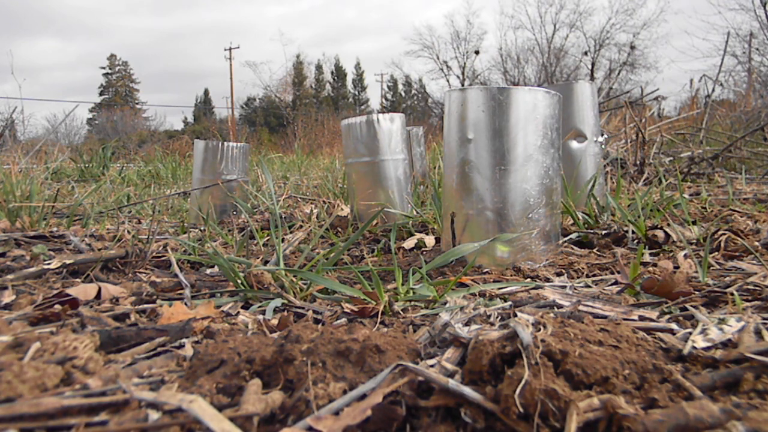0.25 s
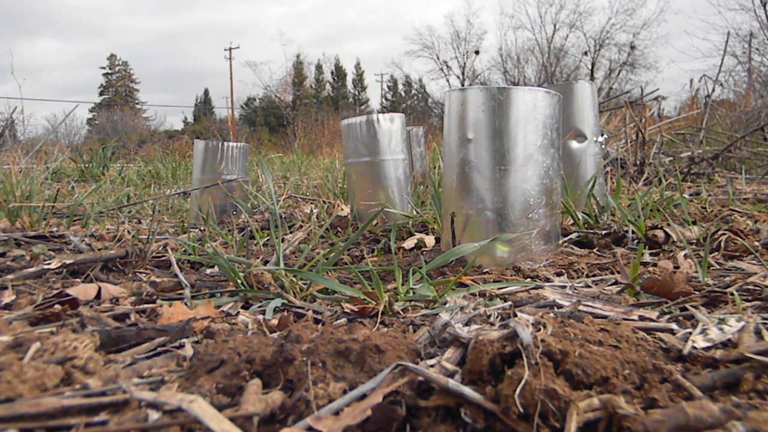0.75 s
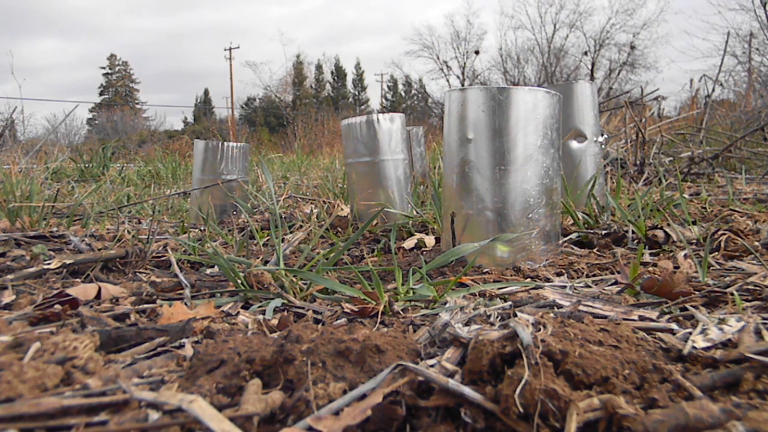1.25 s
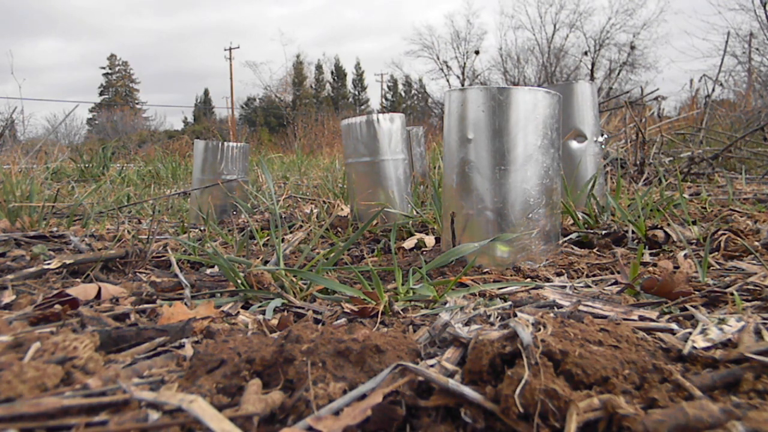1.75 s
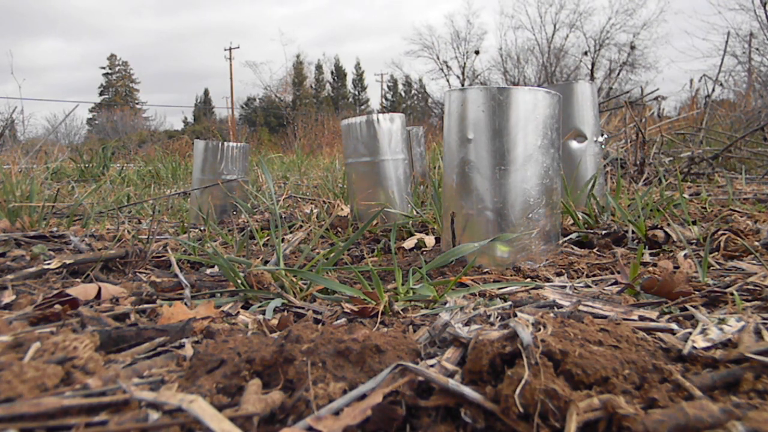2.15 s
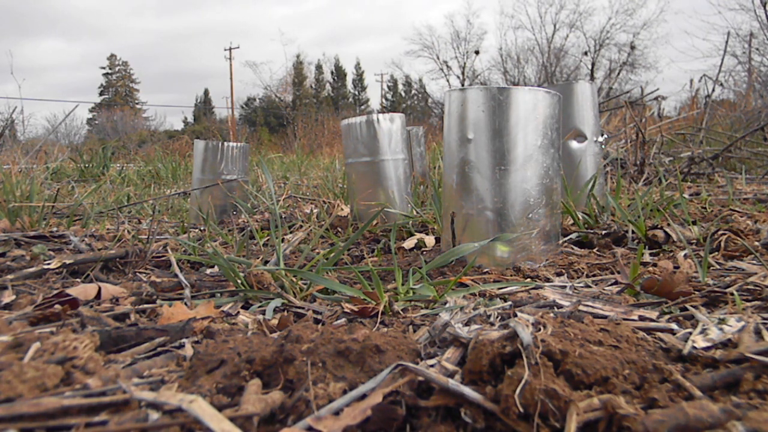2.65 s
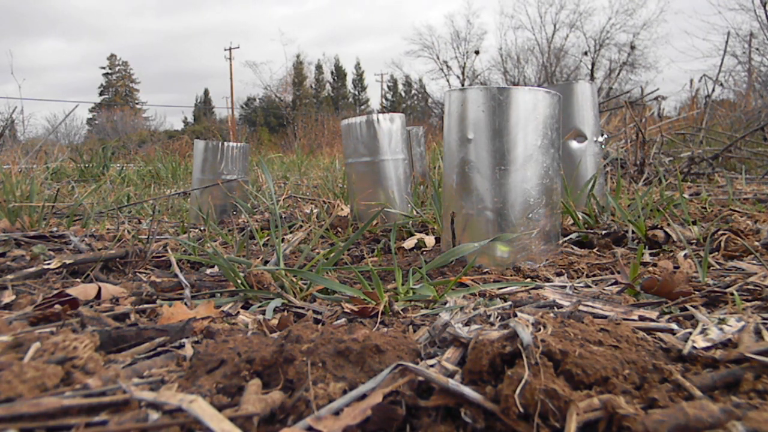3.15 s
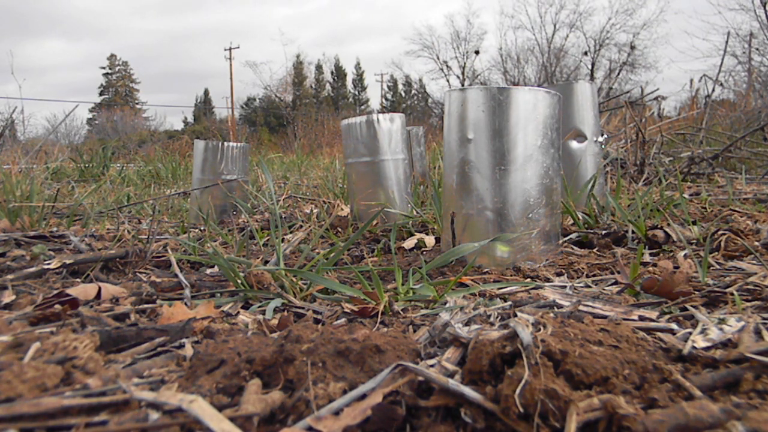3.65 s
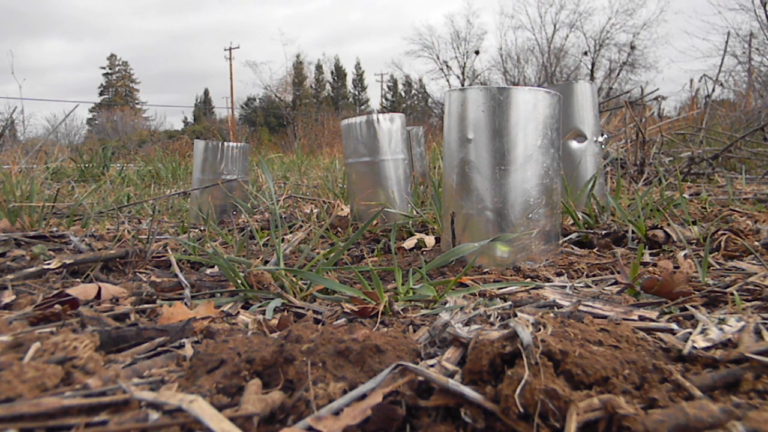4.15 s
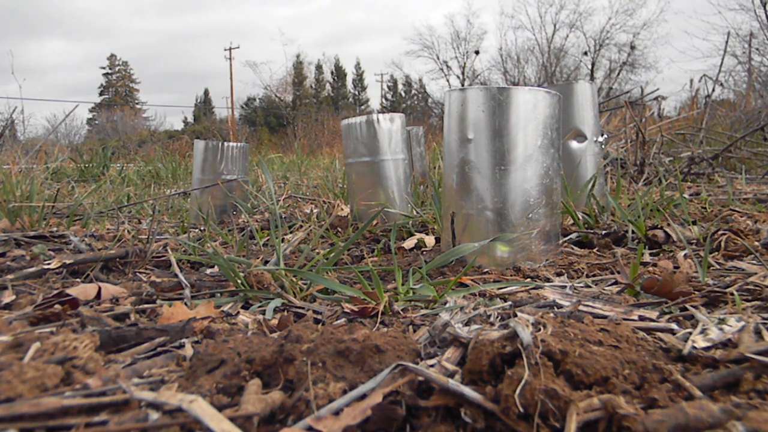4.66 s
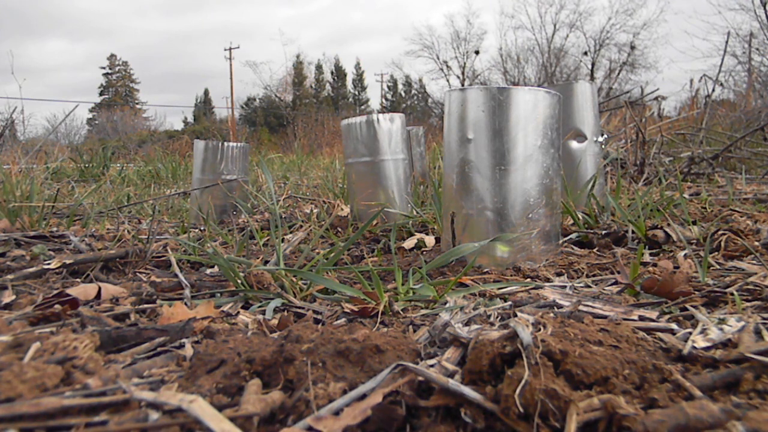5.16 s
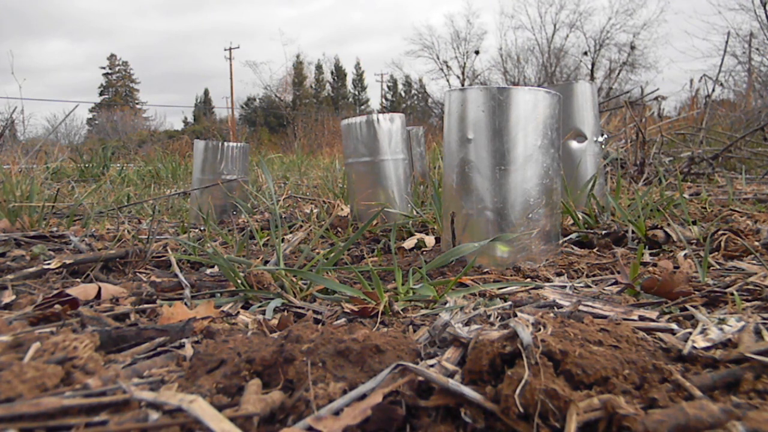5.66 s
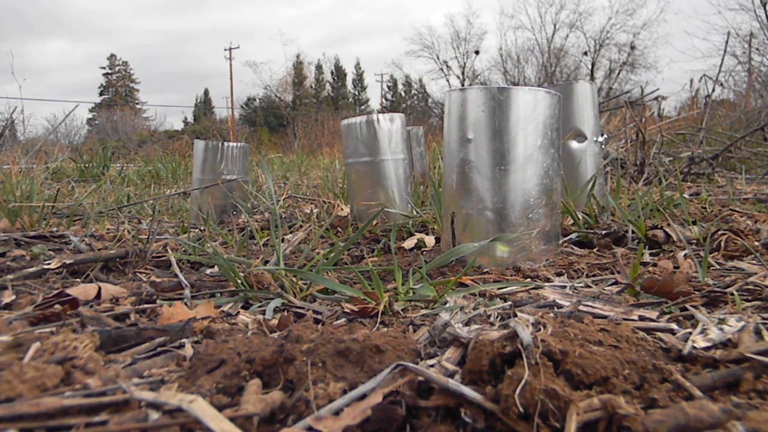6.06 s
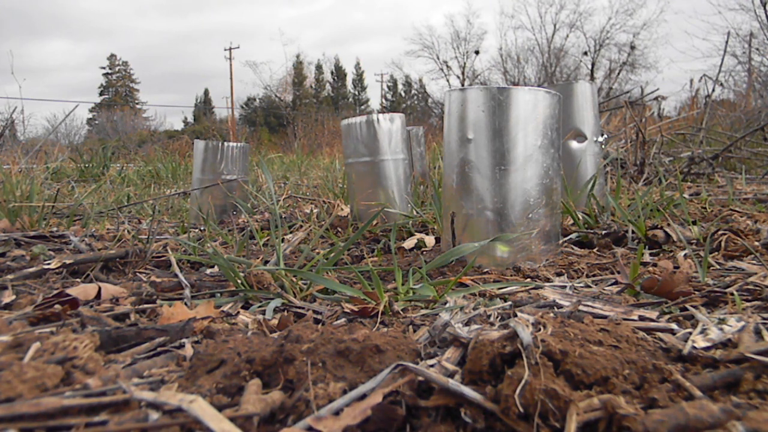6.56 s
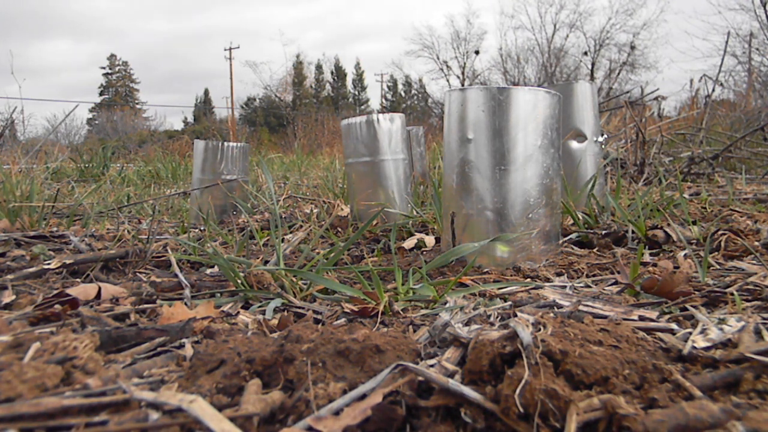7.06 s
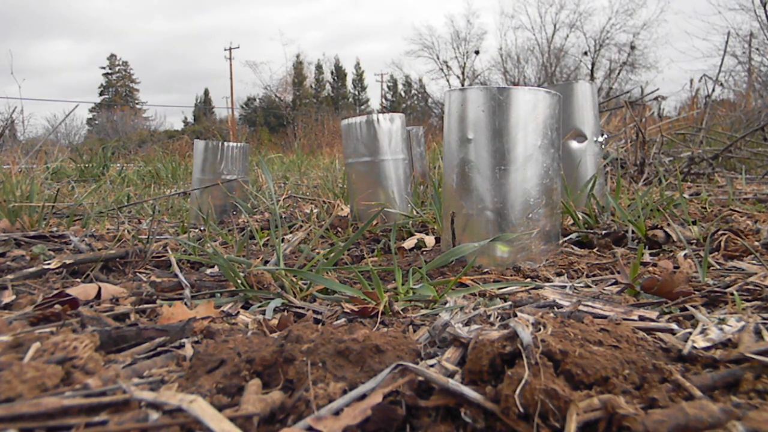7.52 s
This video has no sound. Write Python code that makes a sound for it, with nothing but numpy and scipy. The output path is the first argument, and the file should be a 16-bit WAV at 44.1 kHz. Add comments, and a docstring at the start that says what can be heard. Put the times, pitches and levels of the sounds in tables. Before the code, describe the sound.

A quiet open field for nearly eight seconds, with only distant background sound. Low traffic hum and rumble run throughout, rising near 2.1 seconds, strongest around 3, then easing with smaller swells near 4.5 and 7.2. Small songbirds whistle continually in very short, gliding, mostly falling notes, busy from 2.1 to 2.9 and 3.4 to 4.2, again from 5.2 to 6.6, and scattered to the end. Thin, very high calls appear faintly in the first four seconds. Hoarse distant crows caw off to one side, short and frequent early, with longer, clearer caws at 4.8 and 5.5 and softer ones after 6.3. A dim chorus of farther birds lies behind. Sparse tree echoes smear the calls lightly, while wide, soft air hiss surrounds everything through two close microphone ports. Nothing strikes the cans.

```python
"""In a quiet open field, far traffic swells and fades as four bands of filtered noise.
Songbirds whistle in short gliding sines and thin high calls; crows caw hoarsely in the distance
as sines modulated in amplitude and frequency, over a random chorus of birds farther off.
Sparse echoes smear the calls, and two close microphone ports widen the scene and the hiss of open air."""
import sys
import numpy as np
from scipy import signal
from scipy.fft import rfft, irfft
from scipy.io import wavfile
from scipy.ndimage import uniform_filter1d

SR = 44100
rng = np.random.default_rng(int(sys.argv[2]) if len(sys.argv) > 2 else 0)


def pcm_store(signal):
    """Save signal as 16-bit PCM."""
    levels = np.round(np.clip(np.atleast_2d(signal), -1, 1) * 32767)
    wavfile.write(sys.argv[1], SR, levels.astype(np.int16).T)


N = 343539  # length [samples]

# Spectrum of the traffic noise. Each row: frequency in Hz, relative level in dB.
TRAFFIC_SPECTRUM = [(12, -52), (20, -16.5), (63, 0), (125, 2.5), (258, -8.5), (386, -8.5), (435, -10.5),
                    (544, -24.5), (700, -44.5), (910, -70), (1540, -120)]
# Course of the traffic. Each row: time in seconds, levels in dB of the rumble, the drone above it
# and the upper roar.
TRAFFIC_LEVELS = [(0, -38, -43, -47.5), (.8, -41, -42, -48), (1.2, -38.5, -44, -49.5),
                  (1.5, -43, -42, -46.5), (1.95, -43, -44, -46), (2.15, -34, -40.5, -42),
                  (2.4, -39, -41, -45), (2.8, -35, -35, -40.5), (3.1, -32, -33, -42),
                  (3.43, -37.5, -42, -45), (4.2, -40, -45.5, -50), (4.45, -37, -44, -43.5),
                  (4.75, -37, -42.5, -41), (5.05, -42.5, -48, -47), (5.85, -41.5, -45.5, -49.5),
                  (6.3, -41.5, -44.5, -44), (6.83, -42.5, -47.5, -47.5), (7.15, -38, -41, -44),
                  (7.79, -39, -42, -46.5)]
# Whistled notes, one glide each. Each row: start in seconds, length in seconds, first pitch in Hz,
# last pitch in Hz, peak level in dB.
WHISTLES = [ (0.018, 0.045, 2490, 2600, -60),    (0.101, .05, 2950, 2400, -56), (.12, .08, 2000, 2030, -60),
            (0.187, .02, 2900, 2800, -60), (.235, .025, 2690, 2500, -57), (.43, .12, 2250, 2290, -63),
            (.55, .015, 3100, 3600, -60), (.62, .018, 3500, 3050, -57), (.70, .03, 3420, 3190, -62),
            (.77, .05, 2605, 2600, -56), (0.823, .035, 2730, 2480, -56), (.90, .04, 2010, 2030, -61),
            (.95, 0.083, 2320, 2280, -60), (1.383, .04, 3000, 3300, -60), (1.45, .035, 2950, 3350, -66),
            (1.50, .04, 3500, 2840, -64), (1.50, 0.1, 2560, 2280, -57.5), (1.595, .035, 2720, 2240, -56),
            (1.62, .03, 2850, 2830, -56.5), (1.64, .05, 3650, 3990, -63), (1.93, .03, 2160, 2170, -62),
            (2.04, .03, 2250, 2000, -61), (2.09, .03, 5100, 4400, -61), (2.13, .08, 2400, 2296, -53.5),
            (2.225, .035, 2600, 2200, -57), (2.299, 0.032, 2500, 3940, -53), (2.303, .025, 3850, 6200, -62),
            (2.355, .015, 3110, 1980, -53.5), (2.55, .015, 3200, 2400, -61), (2.56, .035, 3850, 3880, -64),
            (2.615, .02, 3900, 3400, -59), (2.672, 0.054, 2200, 2380, -53.5),
            (2.715, .025, 2650, 2780, -58), (2.715, .02, 2380, 2600, -59), (2.735, .03, 2600, 2380, -60),
            (2.76, 0.094, 2380, 2630, -57), (2.802, .04, 2650, 2820, -59),
            (2.847, 0.052, 2620, 2260, -53.5), (3.101, .18, 3900, 4050, -68),
            (3.362, 0.083, 2135, 2540, -55.5), (3.39, .07, 2730, 2520, -58), (3.452, .12, 2400, 2370, -55),
            (3.47, .02, 3010, 3620, -57), (3.54, .03, 3050, 2600, -57), (3.579, .04, 3600, 3050, -57),
            (3.75, .02, 3950, 4250, -61), (3.80, .02, 2850, 3100, -59), (3.825, .03, 3050, 2650, -55),
            (3.92, .045, 2880, 2600, -54.5), (3.964, .02, 2630, 2230, -52), (3.98, .015, 2550, 2250, -57),
            (3.985, .035, 2220, 2220, -52), (4.04, 0.037, 2650, 2480, -55), (4.074, .02, 2480, 2150, -54),
            (4.10, 0.063, 2170, 2200, -55), (4.215, 0.032, 2780, 2600, -56), (4.244, .055, 2680, 2200, -65),
            (4.77, 0.098, 4500, 4540, -66), (4.86, .17, 5750, 6250, -65), (4.89, .035, 3530, 2540, -59),
            (4.96, .02, 4850, 4800, -64), (5.005, .025, 4700, 4800, -65), (5.105, .135, 3930, 3980, -67),
            (5.20, .055, 3000, 2340, -58.5), (5.261, 0.047, 2950, 2310, -54.5),
            (5.305, 0.046, 2760, 2350, -55), (5.354, .03, 2900, 2500, -55), (5.383, 0.14, 2480, 2364, -58),
            (5.43, .03, 3000, 3050, -60), (5.768, .02, 3250, 3330, -59), (5.785, .02, 3100, 2450, -61),
            (5.911, .04, 2790, 2820, -53), (5.949, .045, 2780, 2660, -54), (5.995, 0.029, 2820, 2480, -58),
            (6.026, 0.067, 2490, 2350, -58), (6.09, .03, 2350, 3050, -54), (6.102, 0.12, 3470, 3380, -60.5),
            (6.245, 0.068, 2850, 2045, -55.5), (6.27, .075, 4220, 4100, -64),
            (6.355, 0.11, 2780, 2860, -57.5), (6.434, .04, 2280, 2330, -54), (6.47, 0.066, 2320, 2790, -55),
            (6.60, .05, 2470, 2400, -56), (6.619, .05, 3710, 3780, -62), (6.80, .075, 2200, 2240, -61),
            (6.985, .05, 3100, 2300, -53.5), (7.035, .055, 2220, 2150, -57),
            (7.091, 0.047, 2710, 2600, -56), (7.135, .025, 2600, 2160, -55), (7.16, 0.066, 2130, 2160, -60),
            (7.227, 0.066, 2950, 2770, -61), (7.632, 0.07, 3030, 3000, -54.5),
            (7.652, 0.042, 3720, 3820, -60), (7.695, 0.032, 3050, 2150, -56), (7.735, .05, 2080, 2150, -58)]
# Thin high calls. Each row: start in seconds, length in seconds, first pitch in Hz, last pitch in Hz,
# peak level in dB.
HIGH_CALLS = [(.38, .20, 9200, 9600, -77), (1.25, .25, 8800, 9400, -74), (1.63, .13, 8350, 8400, -75),
              (2.05, 0.4, 9000, 8950, -72.5), (2.33, .23, 6650, 6750, -75), (3.0, .07, 9200, 8340, -72),
              (3.10, .08, 6940, 6300, -71), (3.30, .10, 7900, 8300, -74), (3.718, 0.2, 9440, 8500, -75),
              (3.93, .09, 6700, 6500, -69)]
# Caws. Each row: start in seconds, length in seconds, top pitch in Hz, last pitch in Hz, peak level in dB.
CAWS = [(.13, 0.13, 1550, 1485, -56), (0.449, 0.25, 1680, 1570, -58.5), (0.832, 0.1, 1800, 1520, -56),
        (1.122, 0.074, 1600, 1400, -56), (1.24, .10, 1800, 1720, -55), (1.629, 0.17, 1850, 1584, -53.5),
        (2.13, 0.064, 1830, 1760, -51.5), (2.23, .07, 1830, 1850, -55), (2.63, 0.12, 1817, 1550, -55),
        (2.753, 0.17, 1700, 1650, -58.5), (3.04, 0.044, 1750, 1750, -54), (3.158, .07, 1710, 1710, -54),
        (3.68, 0.062, 1750, 1550, -53), (4.584, .08, 1620, 1625, -59), (4.81, 0.36, 1740, 1420, -48.5),
        (5.46, .27, 1800, 1540, -48.5), (6.279, 0.26, 1610, 1610, -59), (6.78, 0.13, 1650, 1547, -55.5),
        (7.20, 0.23, 1680, 1700, -57), (7.552, .08, 1680, 1464, -56)]
# Hiss common to both ports. Each row: frequency in Hz, relative level in dB.
COMMON_AIR_SPECTRUM = [(310, -16.5), (520, -2.5), (732, -5), (1220, -8), (1700, -7.5), (2010, -12.5),
                       (2260, -12.5), (3830, -15), (5470, -19.5), (8630, -25), (11500, -32.5),
                       (15000, -29.5), (15700, -26)]
# Hiss opposed in the two ports. Each row: frequency in Hz, relative level in dB.
OPPOSED_AIR_SPECTRUM = [(150, -64), (260, -21), (373, -5), (413, -4), (646, -10.5), (1500, -17.5),
                        (2680, -25.5), (4640, -31.5), (5510, -36), (8040, -39), (11100, -48), (15700, -51)]
# Transfer of the port pair from common to opposed sound. Each row: frequency in Hz, gain in dB,
# phase in radians.
PORT_TRANSFER = [(50, -16.5, 3.5), (200, -16, 2.5), (300, -10.5, 2.8), (400, 2, 1.9), (500, 2.2, 1.77),
                 (696, 1.5, 2.15), (1500, 0, 1.5), (2200, -2, 1.8), (3000, -3, 1.75), (5000, -14, 0.73),
                 (12000, -22, 0.2)]

COMMON_AIR_DB, OPPOSED_AIR_DB = -52.5, -42
BAND_LIMIT_HZ = 15740
HUM_DB, HUM_FOLLOWS = -41.5, 0.17  # deepest hum at mean traffic; share of each rumble swell it follows
BAND_DRIFT_DB = 0.65  # rms random drift of each traffic band
NOTE_PEAK, NOTE_START_DB, NOTE_END_DB = 0.53, -3.5, -5  # peak as share of length; ends relative to it
NOTE_BEND, LEGATO_S = .6, 0.0053  # share of the glide done at the peak; overlap into the next note
CAW_OPENS, CAW_SAGGED = .12, .55  # shares of the length at which the pitch tops and has sagged
CAW_START_PITCH = .9  # share of the top pitch
CAW_START_DB, CAW_SAG_DB, CAW_END_DB = -3., -3, -8.5  # relative to the peak


def gain_of(db):
    """An amplitude ratio is ten to the power of its decibels over twenty."""
    return 10 ** (np.asarray(db) / 20)


def evened(x):
    """Division by the root mean square normalizes a signal to rms 1."""
    return x / np.sqrt(np.mean(abs(x) ** 2) + 1e-20)


def read(hz, at_hz, value):
    """A spectrum is interpolated linearly along a logarithmic frequency axis."""
    return np.interp(np.log(hz + 1), np.log(np.asarray(at_hz) + 1), value)


def smoothed(x, bins, frames):
    """Averaging over neighbouring bins and frames correlates a random field, here scaled to rms 1."""
    across = uniform_filter1d(x, size=bins, axis=0)
    return evened(uniform_filter1d(across, size=frames, axis=1))


def wander(count, size):
    """Noise averaged twice over size samples is a slow random drift, scaled to rms 1."""
    once = uniform_filter1d(rng.standard_normal(count), size=size)
    return evened(uniform_filter1d(once, size=size))


def traffic(edges_hz=(100, 170, 330), blend_hz=30):
    """Superposed noise bands, separately modulated, make the hum, rumble, drone and roar of traffic."""
    s, rumble_db, drone_db, roar_db = np.transpose(TRAFFIC_LEVELS)
    hum_db = HUM_DB + HUM_FOLLOWS * (rumble_db - rumble_db.mean())
    hz, t = np.fft.rfftfreq(N, 1 / SR), np.arange(N) / SR
    spectrum = rfft(rng.standard_normal(N)) * gain_of(read(hz, *np.transpose(TRAFFIC_SPECTRUM)))
    # Each ramp passes what lies above its edge; differences of ramps are bands.
    low, middle, high = (np.clip((hz - edge) / blend_hz + .5, 0, 1) for edge in edges_hz)
    shares = 1 - low, low - middle, middle - high, high
    out = np.zeros(N)
    for db, share in zip((hum_db, rumble_db, drone_db, roar_db), shares):
        band = evened(irfft(spectrum * share, N))
        level_db = np.interp(t, s, db) + BAND_DRIFT_DB * wander(count=N, size=8000)
        out += gain_of(level_db) * band
    return out


def whistle(start, length, first_hz, last_hz, db):
    """A whistled note is a frequency glide, quicker at first, under a swelling and fading envelope."""
    peak_hz = first_hz + NOTE_BEND * (last_hz - first_hz)
    end = start + length
    return [(start, first_hz, db + NOTE_START_DB),
            (start + NOTE_PEAK * length, peak_hz, db),
            (end, last_hz, db + NOTE_END_DB),
            (end + LEGATO_S, last_hz, db + NOTE_END_DB)]


def caw(start, length, top_hz, last_hz, db):
    """Pitch and level are coupled: the throat opens fast to its top pitch, sags and dies away low."""
    sagged_hz = last_hz + .2 * (top_hz - last_hz)
    return [(start, CAW_START_PITCH * top_hz, db + CAW_START_DB),
            (start + CAW_OPENS * length, top_hz, db),
            (start + CAW_SAGGED * length, sagged_hz, db + CAW_SAG_DB),
            (start + length, last_hz, db + CAW_END_DB)]


def birds(notes, waver_hz, shake_db, throb=0., throbs_per_s=59.8, sweep_hz=0., fade_s=0.0041):
    """A wavering sine is a whistle; joint amplitude and frequency modulation makes a throat hoarse."""
    out = np.zeros(N)
    for rows in notes:
        s, hz, db = np.transpose(rows)
        t = np.arange(s[0], s[-1], 1 / SR)
        throb_rate = throbs_per_s * (1 + .15 * wander(count=len(t), size=300))
        beat = 2 * np.pi * (np.cumsum(throb_rate) / SR + rng.random())
        pitch_hz = np.interp(t, s, hz) + waver_hz * wander(count=len(t), size=60)
        pitch_hz -= sweep_hz * np.sin(beat)  # rises through the loud part of each throb
        phase = 2 * np.pi * np.cumsum(pitch_hz) / SR
        note = np.sin(phase) * (1 - throb * np.cos(beat))
        level = gain_of(np.interp(t, s, db) + shake_db * wander(count=len(t), size=220))
        fade = np.clip(np.minimum(t - s[0], s[-1] - t) / fade_s, 0, 1)
        part = out[round(s[0] * SR):][:len(t)]
        part += (evened(note) * level * fade)[:len(part)]
    return out


def far_chorus(count, low_hz, high_hz, db, spread_db, glide=.12):
    """Many independent sources form a random sequence of short notes, most of them falling."""
    when, pitch, length, slope, size = rng.random((count, 5)).T
    start = when * (N / SR - .2)
    end = start + 0.02 + .07 * length
    first_hz = low_hz * (high_hz / low_hz) ** pitch
    last_hz = first_hz * (1 + glide * (1.4 * slope - 1))
    level_db = db + spread_db * (size - .5)
    return [[(a, f, d), (b, g, d)] for a, b, f, g, d in zip(start, end, first_hz, last_hz, level_db)]


def trees(x, t60=0.65):
    """Scattering from trees and fences is a convolution with sparse, exponentially decaying echoes."""
    t = np.arange(SR) / SR
    signs = rng.choice([-1., 1.], len(t))
    present = (rng.random(len(t)) < .05) * (t > .008)
    echoes = signs * present * gain_of(-60 * t / t60)
    return signal.fftconvolve(x, echoes / np.linalg.norm(echoes))[:N]


def air_hiss(tone, patchy_db, flicker_db):
    """Open air is coloured noise, modulated in drifting patches and by a flicker shared over wide bands."""
    frames, hz = N // 256 + 5, np.fft.rfftfreq(1024, 1 / SR)
    real, imaginary, patches, flicker = rng.standard_normal((frames, 513, 4)).T
    colour_db = read(hz, *np.transpose(tone))[:, None]
    change_db = (patchy_db * smoothed(patches, bins=5, frames=7)
                 + flicker_db * smoothed(flicker, bins=200, frames=4))
    z = (real + 1j * imaginary) * gain_of(colour_db + change_db)
    return evened(signal.istft(z, nperseg=1024, noverlap=768)[1][:N])


def port_pair(common):
    """Two close ports act as a linear filter of gain and phase turning common into opposed sound."""
    hz = np.fft.rfftfreq(N, 1 / SR)
    at_hz, db, phase = np.transpose(PORT_TRANSFER)
    transfer = gain_of(read(hz, at_hz, db)) * np.exp(1j * read(hz, at_hz, phase))
    return irfft(rfft(common) * transfer, N)


def scene():
    """By superposition, left and right are the sum and difference of common and opposed sound."""
    song = birds([whistle(*row) for row in WHISTLES], waver_hz=60.4, shake_db=2.0)
    song += birds([whistle(*row) for row in HIGH_CALLS], waver_hz=150, shake_db=2.0)
    crows = birds([caw(*row) for row in CAWS], waver_hz=50.6, shake_db=1.0,
                  throb=0.31, throbs_per_s=58, sweep_hz=93.5, fade_s=0.015)

    middle_notes = far_chorus(count=220, low_hz=1999, high_hz=4112, db=-69.5, spread_db=6.5)
    hoarse_notes = far_chorus(count=60, low_hz=1459, high_hz=1904, db=-65.5, spread_db=4.5)
    high_notes = far_chorus(count=200, low_hz=4220, high_hz=9800, db=-80.5, spread_db=10)
    far = birds(middle_notes, waver_hz=69.6, shake_db=3.0)
    far += birds(hoarse_notes, waver_hz=70, shake_db=2.5, throb=.4, sweep_hz=70)
    far += birds(high_notes, waver_hz=90, shake_db=3.5)
    calls = song + crows + far

    common = traffic() + calls + gain_of(-6.5) * trees(calls)
    common += gain_of(COMMON_AIR_DB) * air_hiss(COMMON_AIR_SPECTRUM, patchy_db=1.18, flicker_db=0.68)

    # The crows are off to one side, so more of them is heard opposed.
    opposed = port_pair(common + .4 * crows)
    opposed += gain_of(OPPOSED_AIR_DB) * air_hiss(OPPOSED_AIR_SPECTRUM, patchy_db=.6, flicker_db=0.8)
    # Independent traffic noise and echoes widen the image.
    opposed += gain_of(-24.5) * traffic() + gain_of(-9) * trees(calls)
    return np.array([common + opposed, common - opposed])


def record(dry, bass_cut_hz=26):
    """A first-order high-pass is the microphone's bass loss; a steep low-pass is the recorder's band limit."""
    thinned = signal.lfilter(*signal.butter(N=1, Wn=bass_cut_hz, btype="high", fs=SR), dry)
    low_pass = signal.firwin(1023, BAND_LIMIT_HZ, window=("kaiser", 9), fs=SR)
    return signal.oaconvolve(thinned, low_pass[None], "same")


dry = scene()
out = record(dry)
pcm_store(out)
```